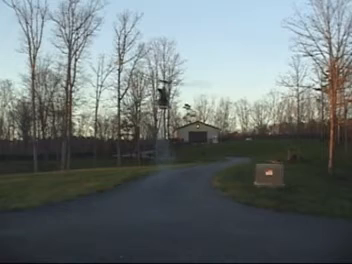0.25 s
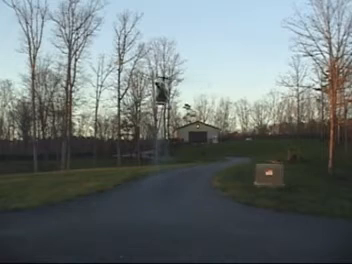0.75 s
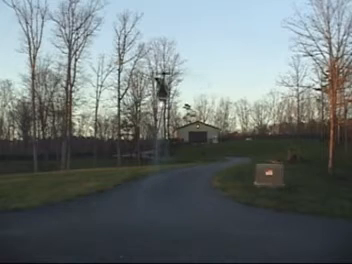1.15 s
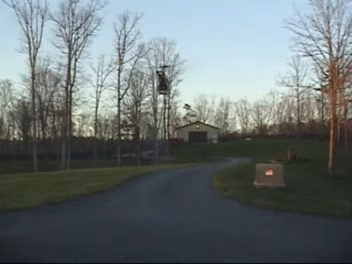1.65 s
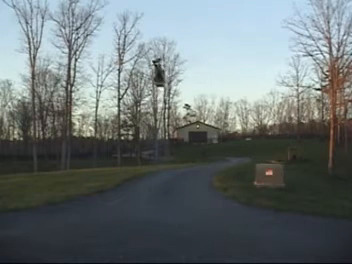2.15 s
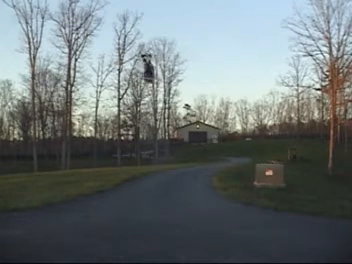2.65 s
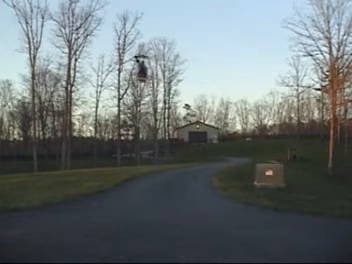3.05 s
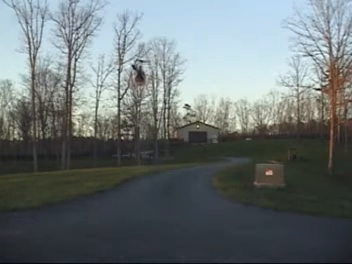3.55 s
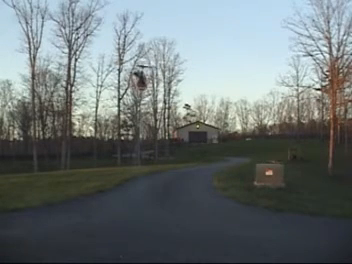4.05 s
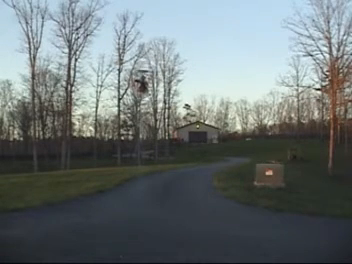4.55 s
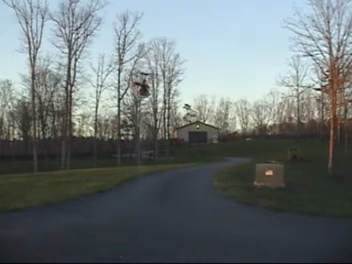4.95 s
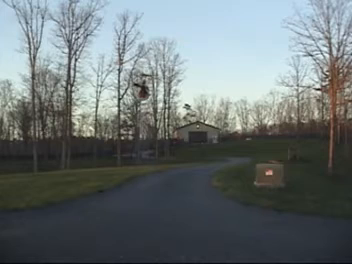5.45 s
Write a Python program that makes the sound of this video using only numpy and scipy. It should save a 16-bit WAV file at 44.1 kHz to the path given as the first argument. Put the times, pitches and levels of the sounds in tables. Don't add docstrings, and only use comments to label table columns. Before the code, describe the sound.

Steady nasal buzz and whine of a hovering model helicopter, with fluttering rotor swish, slight pitch drift and a faint breeze behind.

```python
import sys
import numpy as np
from scipy import signal
from scipy.fft import rfft, irfft, next_fast_len
from scipy.io import wavfile
from scipy.ndimage import map_coordinates

SR = 44100
rng = np.random.default_rng(int(sys.argv[2]) if len(sys.argv) > 2 else 0)


def store_pcm(level_fs):
    pcm = np.round(np.clip(level_fs, -1, 1) * 32767).astype(np.int16)
    wavfile.write(sys.argv[1], SR, np.atleast_2d(pcm).T)


def volts_from_decibels(level):
    exponent = np.asarray(level, float) / 20
    return 10 ** exponent


N = 250929
T = np.arange(N) / SR
ROTOR_TURNS_PER_CRANK_TURN = .104


def unit(x):
    return x / np.sqrt(np.mean(x ** 2))


def curves(rows):
    s, *cols = np.transpose(rows)
    return [np.interp(T, s, c) for c in cols]


def along(points):
    f, db = np.transpose(points)
    return lambda hz: volts_from_decibels(np.interp(np.log(hz + 1), np.log(f), db))


def peak(f, hz, width):
    return 1j * f * width / (hz * hz - f * f + 1j * f * width)


def filtered(x, response):
    m = next_fast_len(N + SR // 4)
    return irfft(rfft(x, m) * response(np.fft.rfftfreq(m, 1 / SR)), m)[:N]


def noise(response):
    return unit(filtered(rng.standard_normal(N), response))


def ringing(modes):
    def response(f):
        powers = [np.abs(volts_from_decibels(db) * peak(f, hz, width) ** 2) ** 2 for hz, width, db in modes]
        return np.sqrt(sum(powers))
    return noise(response)


def wobble(rate_hz):
    coarse = T[::64]
    knots = rng.standard_normal(int(N * rate_hz / SR) + 4)
    return np.interp(T, coarse, map_coordinates(knots, [coarse * rate_hz], mode="mirror"))


def late(x, lag_s):
    return map_coordinates(x, [(T - lag_s) * SR], order=3, mode="mirror")


def tone(db, phase, flutter_db):
    return np.sqrt(2) * volts_from_decibels(db + flutter_db * wobble(12)) * np.cos(phase)


def any_phase():
    return rng.uniform(0, 2 * np.pi)


# f/Hz, level/dB per Hz
AIR_SPECTRUM = [(20, -14), (60, -14), (100, -3), (140, 1.5), (190, -2), (300, 0.5), (420, -3), (800, -8),
                (3000, -47)]
# t/s, swell/dB
BREEZE_GUSTS = [
    (0.0, 2),
    (1.0, 0),
    (1.5, 0),
    (3.3, 3.5),
    (4.7, 4),
    (5.7, 7),
]


def breeze():
    calm_db, gust_s = -2, 0.5
    swell_db = calm_db + sum(db * np.exp(-((T - s) / gust_s) ** 2) for s, db in BREEZE_GUSTS)
    return volts_from_decibels(swell_db - 57.5 + 0.98 * wobble(3.04)) * noise(along(AIR_SPECTRUM))


# t/s, f/Hz, level/dB
FAR_HUM = [
    (0, 153.4, -63.5),
    (2.4, 152.7, -62.5),
    (2.9, 152, -75),
    (3.6, 150, -70),
    (5.69, 146, -57.5),
]


def far_hum():
    hz, db = curves(FAR_HUM)
    return tone(db, 2 * np.pi * np.cumsum(hz) / SR, flutter_db=2.0)


# t/s, peak level/dB
WIND_PUFFS = [
    (2.929, -56),
    (3.036, -53),
    (3.239, -54),
    (3.599, -48),
    (3.759, -53),
    (4.439, -55),
]


def wind_puffs():
    out = np.zeros(N)
    for s, db in WIND_PUFFS:
        since_peak = T - s - .015
        out += volts_from_decibels(db) * np.exp(-(since_peak / 0.013) ** 2) * np.cos(2 * np.pi * 55 * since_peak)
    return out


# t/s, firing rate/Hz
CRANK_SPEED = [(0.0, 230.42), (0.45, 231.07), (0.9, 231.18), (1.25, 231.99), (1.65, 232.04), (2.1, 231.72),
               (2.55, 231.64), (2.85, 231.02), (3.15, 230.94), (3.45, 230.28), (3.75, 230.5), (4.0, 230.82),
               (4.5, 230.75), (4.8, 231.36), (5.1, 231.89), (5.45, 231.87), (5.69, 231.38)]


def crank_angle():
    return 2 * np.pi * np.cumsum(curves(CRANK_SPEED)[0]) / SR


def attitude():
    turn_s, turn_takes_s = 3.72, .3
    turned = .5 * np.tanh((T - turn_s) / turn_takes_s)
    return 0.57 * turned + 0.085, -2 * turned + 0.1, 2.5 * turned - .3


# rotor multiple, level/dB rms
LIFT_BEATS = [
    (2, -73),
    (4, -75.5),
    (5, -76),
    (10, -64),
    (20, -61.5),
    (24, -70.5),
]


def lift_beats(rotor):
    return sum(tone(db, m * rotor + any_phase(), flutter_db=.4) for m, db in LIFT_BEATS)


def circling(x, angle, focus):
    tip_mach = .33
    mean_firing_hz = np.mean(np.transpose(CRANK_SPEED)[1])
    swing_s = tip_mach / (2 * np.pi * ROTOR_TURNS_PER_CRANK_TURN * mean_firing_hz)
    beam = (1 + tip_mach * np.cos(angle + 0.44)) ** focus
    return unit(late(x, -swing_s * np.sin(angle)) * beam)


# fastest approach/turn, level/dB, f at rest/Hz, width/Hz
TIP_VORTICES = [
    (0.315, -45.5, 7217, 220),
    (0.317, -48, 6200, 300),
    (0.799, -53, 7420, 700),
    (0.797, -55.5, 6070, 500),
]
# f/Hz, level/dB per Hz
EDGE_SPECTRUM = [(1500, -13), (3000, -8), (4500, -4.5), (6500, 1.5), (7600, -2.5), (8600, -16), (9800, -18),
                 (11200, -33), (12500, -54)]


def blade_hiss(rotor):
    out = np.zeros(N)
    for turn, db, hz, width in TIP_VORTICES:
        out += volts_from_decibels(db) * circling(ringing([(hz, width, 0)]), rotor - 2 * np.pi * turn, focus=3.1)
    for turn in (.32, .82):
        out += volts_from_decibels(-44.5) * circling(noise(along(EDGE_SPECTRUM)), rotor - 2 * np.pi * turn, focus=4.2)
    return out


# crank multiple, tooth-rate multiple, level/dB rms
TOOTH_MESH = [
    (0, 1, -45.3),
    (-1, 1, -49),
    (0, 2, -51),
]
# crank multiple, rotor multiple, level/dB rms
DRIVE_SIDE_TONES = [
    (0, 85, -59.9),
    (0, 94, -59.4),
    (1, 91, -60.5),
    (-2, 91, -62),
]


def gears(crank, rotor):
    teeth_per_turn = 90
    runout_rad, runout_phase, runout_share = .8, .8, .2
    slack = .08 * wobble(25)
    teeth = teeth_per_turn * rotor + runout_rad * np.sin(rotor + runout_phase) + slack
    mesh = sum(tone(db, k * crank + m * teeth + any_phase(), flutter_db=.7) for k, m, db in TOOTH_MESH)
    side = sum(tone(db, k * crank + m * rotor + slack + any_phase(), flutter_db=.7)
               for k, m, db in DRIVE_SIDE_TONES)
    return (1 + runout_share * np.cos(rotor + runout_phase)) * mesh + side


def firing_gate(crank, rotor, depth_db, turn_db=1.14):
    return volts_from_decibels(depth_db * np.cos(crank - .7) + turn_db * np.cos(rotor) + 0.52 * wobble(30))


# f/Hz, level/dB per Hz
RASP_SPECTRUM = [(250, -25), (450, -17), (1000, -2.5), (2400, -4.5), (3100, -5), (4800, -8.5), (7000, -5.5),
                 (10000, -6), (13000, -20.5), (14500, -34), (15400, -55)]


def rasp(crank, rotor):
    gate = firing_gate(crank, rotor, 0.86, turn_db=0.7)
    return volts_from_decibels(-40.5) * unit(gate * noise(along(RASP_SPECTRUM)))


# f/Hz, width/Hz, level/dB
BODY_MODES = [(507, 134, -2.5), (718, 86, 2.5), (1018, 210, 2.5), (1290, 124, 0.5), (1746, 120, 2.5),
              (1946, 430, 8), (2500, 1180, 0.5)]
# f/Hz, width/Hz, level/dB
CANOPY_MODES = [(3170, 390, -1), (4046, 440, 4.5), (5390, 660, -0.5), (6320, 320, -0.5)]


def rattle(crank, rotor, facing_db):
    body = volts_from_decibels(-40.0) * unit(firing_gate(crank, rotor, 1.6) * ringing(BODY_MODES))
    canopy = volts_from_decibels(facing_db - 43) * unit(firing_gate(crank, rotor, 6.9) * ringing(CANOPY_MODES))
    return body + canopy


# crank multiple, level/dB rms
EXHAUST_ORDERS = [(1, -49.5), (2, -58), (3, -59), (4, -43), (5, -55), (6, -50.5), (7, -45), (8, -67),
                  (9, -54), (10, -59), (11, -53.5), (12, -53.5), (13, -55), (14, -55), (15, -54), (16, -61),
                  (17, -56.5), (18, -50), (19, -57), (20, -58.5), (22, -56.5), (23, -55), (24, -53.5),
                  (25, -70), (26, -67)]
# crank multiple, rotor multiple, level/dB rms
CHOPPED_TONES = [(1, 2, -62), (1, 4, -61.5), (2, 2, -70), (2, 5, -61.5), (3, -5, -70), (3, -1, -56),
                 (3, 1, -57.5), (3, 4, -70), (3, 5, -61), (4, -1, -60), (4, 1, -49.5), (5, -1, -63.5),
                 (5, 1, -59.5), (6, -2, -73), (6, -1, -54.5), (6, 1, -58), (6, 2, -61.5)]


def exhaust(crank, rotor, facing_db):
    muffled_orders = 6
    sway_rad, sway_phase = .17, 1.2
    firing, sway = crank - .35, rotor + sway_phase
    swayed = firing + sway_rad * np.sin(sway) + .004 * wobble(40)
    out = np.zeros(N)
    for k, db in EXHAUST_ORDERS[:muffled_orders]:
        out += tone(db, k * firing, flutter_db=.35)
    for k, db in EXHAUST_ORDERS[muffled_orders:]:
        smeared = swayed + .09 * rng.normal()
        out += volts_from_decibels(facing_db * k / 24) * tone(db, k * smeared, flutter_db=.6)
    for k, m, db in CHOPPED_TONES:
        out += np.sign(m) * tone(db, k * firing + m * sway, flutter_db=.8)
    return out


# t/s, echo lag/ms
GROUND_LAG = [
    (0, 1.19),
    (.8, 1.265),
    (1.45, 1.305),
    (1.9, 1.39),
    (2.35, 1.44),
    (2.8, 1.485),
    (3.3, 1.445),
    (4.3, 1.28),
    (5.69, 1.26),
]


def ground_echo(engine, drive):
    drive_extra_ms = .075
    lag_ms = curves(GROUND_LAG)[0] - .03
    echo = late(engine, lag_ms / 1000) + late(drive, (lag_ms + drive_extra_ms) / 1000)
    return filtered(echo, lambda f: .45 / (1 + 1j * f / 6000) + .3 / (1 + 1j * f / 900))


def scene():
    crank = crank_angle()
    rotor = ROTOR_TURNS_PER_CRANK_TURN * crank
    engine_db, blade_db, facing_db = attitude()
    outdoors = breeze() + far_hum() + wind_puffs()
    hiss = volts_from_decibels(blade_db) * blade_hiss(rotor)
    drive = volts_from_decibels(engine_db) * (gears(crank, rotor) + rasp(crank, rotor))
    pulses = exhaust(crank, rotor, facing_db) + rattle(crank, rotor, facing_db)
    engine = volts_from_decibels(engine_db) * pulses + lift_beats(rotor)
    return (engine + drive + ground_echo(engine, drive) + hiss + outdoors)[None]


def roll_off(x):
    return signal.sosfilt(signal.butter(12, 15220, fs=SR, output="sos"), x)


def record(dry):
    return roll_off(dry)


dry = scene()
out = record(dry)
store_pcm(out)
```